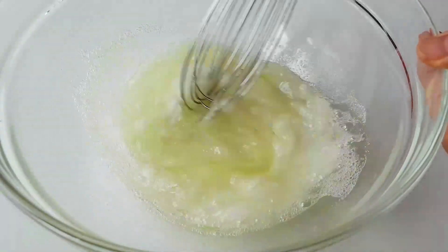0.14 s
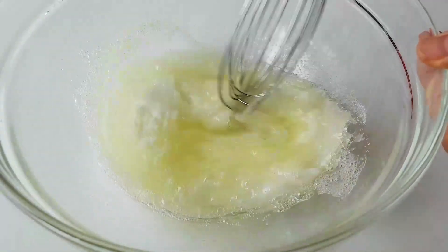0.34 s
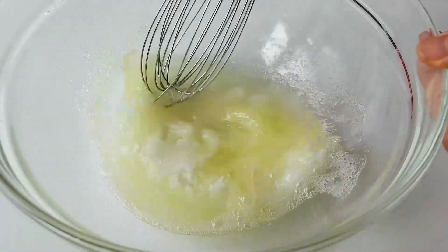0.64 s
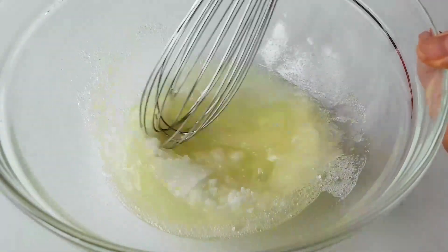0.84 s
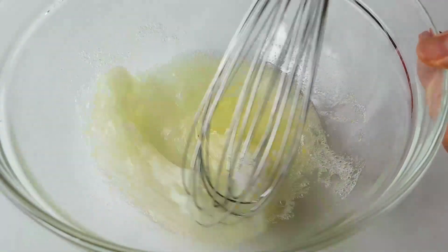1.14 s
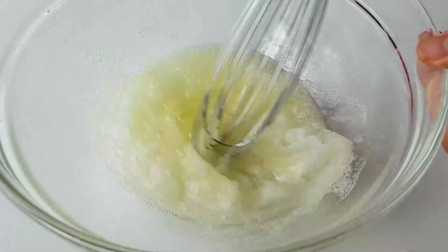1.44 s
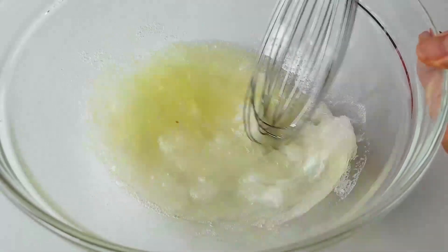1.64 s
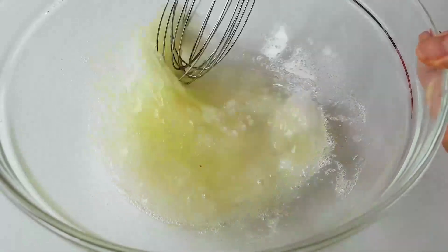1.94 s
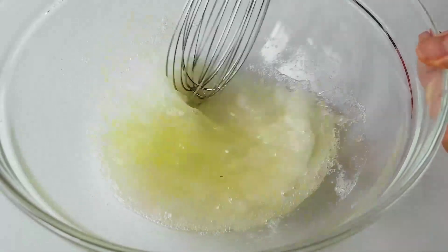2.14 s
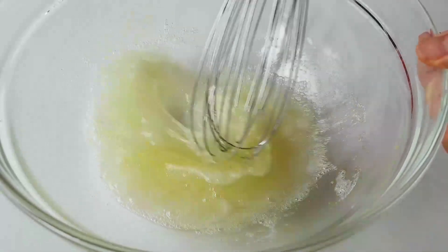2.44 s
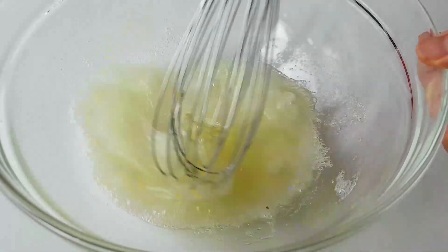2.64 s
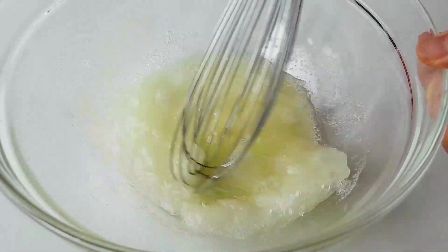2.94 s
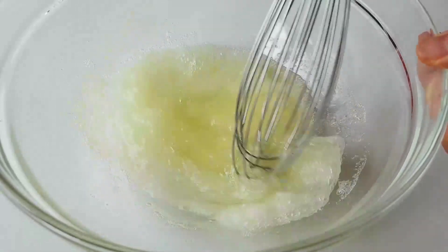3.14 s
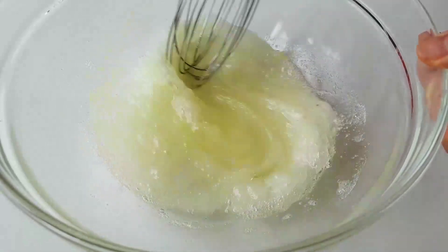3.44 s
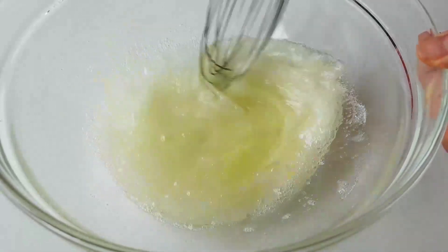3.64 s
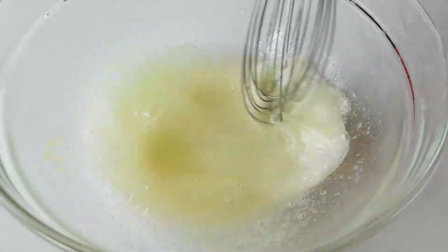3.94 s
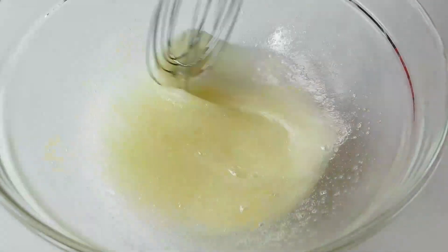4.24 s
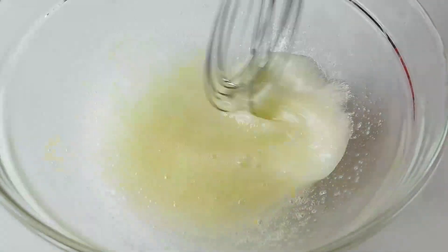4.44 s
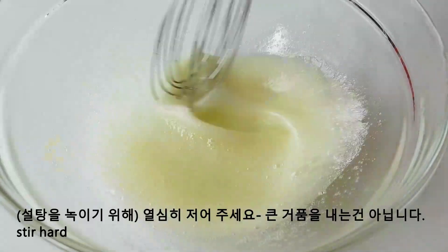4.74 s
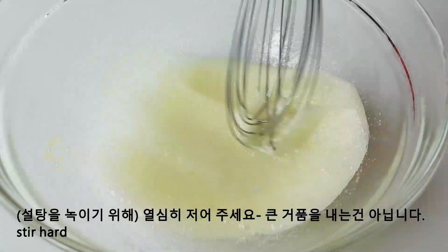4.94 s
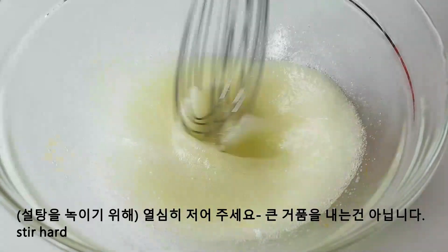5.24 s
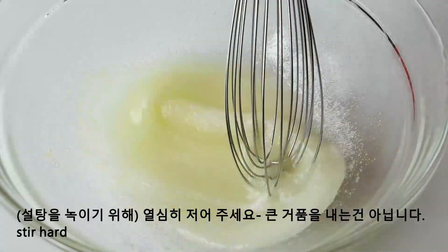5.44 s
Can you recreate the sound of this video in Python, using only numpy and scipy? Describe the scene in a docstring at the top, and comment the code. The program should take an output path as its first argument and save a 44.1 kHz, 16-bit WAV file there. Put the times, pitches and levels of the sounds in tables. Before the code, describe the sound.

A wire whisk beats egg and sugar in a glass bowl, close to the microphone in a quiet kitchen. Quick, uneven, gritty scrapes run throughout, mixed with soft sloshing and small wet slaps. The bowl knocks on a hollow counter now and then, and the wires clink brightly on the glass about two seconds in. The loudest knock and slap come near the end.

```python
"""Whisking egg and sugar

A wire whisk works in a glass bowl on a hollow kitchen counter, close to a stereo microphone.
Friction on sugar grains excites whisk and bowl in short strokes; the batter swishes, slaps and pops.
The bowl knocks the counter into booming resonance, and the wires clink on bare glass.
A look-ahead gain control ducks just before loud blows."""
import sys
import numpy as np
from scipy import signal
from scipy.fft import rfft, irfft, next_fast_len
from scipy.io import wavfile
from scipy.ndimage import uniform_filter1d

SR = 44100
rng = np.random.default_rng(int(sys.argv[2]) if len(sys.argv) > 2 else 0)


def output_pcm(signal):
    """Save a mono or channel-first signal as 16-bit PCM at the path in sys.argv[1].

    Samples are clipped to [-1, 1] before scaling.
    """
    pcm = np.clip(np.atleast_2d(signal).T, -1, 1) * 32767
    wavfile.write(sys.argv[1], SR, np.round(pcm).astype(np.int16))


N = 246078

# Strokes of the wires on the glass. Each row: start in seconds, length in seconds, level in dB,
# treble offset in dB.
STROKES = [(0.036, 0.029, -43.5, -0.5), (0.09, 0.09, -47, -8.5), (0.27, 0.017, -49.5, 2),
           (0.362, 0.078, -47.5, -1.5), (0.483, .033, -47.5, 7), (0.608, 0.059, -46, 0),
           (0.714, 0.038, -42.5, 1.5), (0.798, .015, -45, 0), (0.824, .045, -52, 2.5),
           (0.958, 0.139, -48.5, -5), (1.16, 0.018, -50, 5.5), (1.246, 0.047, -54, 1),
           (1.369, .029, -51.5, -11), (1.396, 0.025, -56, 8.5), (1.452, 0.061, -48, 4),
           (1.542, 0.049, -51.5, -4), (1.594, 0.026, -51, 3), (1.694, 0.03, -38.5, -5.5),
           (1.741, .1, -47, -1), (1.93, 0.052, -45, -11), (1.997, 0.041, -43, 7.5), (2.058, 0.017, -50, -2),
           (2.123, 0.05, -41.5, -2), (2.228, 0.057, -39.5, -3.5), (2.306, 0.069, -52, -17),
           (2.369, 0.021, -45, 1), (2.453, 0.032, -39, -2), (2.541, 0.062, -39.5, -9),
           (2.673, 0.021, -35.5, -9.5), (2.764, 0.071, -47.5, 4.5), (2.889, 0.021, -45.5, 6),
           (2.957, 0.062, -43, 2.5), (3.101, 0.029, -45, 4.5), (3.205, 0.05, -42.5, 1),
           (3.265, 0.022, -52, 0), (3.412, 0.04, -40.5, -10), (3.453, 0.049, -47, -10),
           (3.653, .12, -53, -3), (3.791, 0.0072, -38.5, -2), (3.798, 0.08, -53, 2.5),
           (3.972, 0.062, -51.5, 4), (4.065, 0.07, -54.5, -10), (4.098, 0.053, -49, 7),
           (4.257, 0.039, -48, 4.5), (4.344, .017, -49, 7), (4.525, 0.033, -56.5, 6.5),
           (4.583, 0.0072, -49, -11), (4.599, 0.018, -46.5, 8), (4.739, 0.007, -42, 2.5),
           (4.781, 0.0079, -34.5, -27), (4.839, 0.053, -41, -0.5), (5, 0.0068, -41, 2),
           (5.065, 0.037, -50.5, -19), (5.07, .015, -55, 4), (5.107, 0.032, -40, 0),
           (5.162, 0.019, -44.5, 2.5), (5.232, 0.037, -46.5, 5.5), (5.321, .026, -43, -5),
           (5.37, 0.02, -45.5, 5), (5.448, 0.0047, -36.5, 4), (5.543, 0.015, -49.5, 5.5)]
# Modes of whisk and bowl under friction. Each row: frequency in Hz, bandwidth in Hz, level in dB.
RUBBED_MODES = [(2330, 70, 0), (2540, 100, -2), (3250, 130, -4), (3650, 300, -6), (4250, 200, -5),
                (5900, 400, -9), (7290, 110, -2), (7750, 400, -4), (8020, 130, -3), (9800, 250, -5),
                (10900, 400, -8), (11700, 300, -8), (12720, 260, -4), (14500, 300, -8), (15200, 300, -9)]
# Spectrum of the sugar grains. Each row: frequency in Hz, relative density in dB.
GRIT_SPECTRUM = [(900, -31), (1500, -54), (2500, 10.5), (5500, 7), (7800, 16), (10800, 6.5), (13000, 15.5),
                 (16000, 5.5)]
# Slaps of the batter. Each row: start in seconds, air pocket pitch in Hz, its level in dB,
# splash pitch in Hz, its level in dB, crack level in dB, splash left over right in dB.
SLAPS = [(0.127, 536, -54, 2320, -46, -28.5, -10), (.806, 780, -43, 1870, -28, -23.5, 17),
         (.887, 855, -46, 1200, -37, -57, 11), (0.944, 670, -30, 1800, -30.5, -56, 14.5),
         (0.987, 726, -53, 1480, -31, -40, -2), (1.176, 940, -51, 2470, -35, -27.5, -3),
         (1.56, 517, -37.5, 980, -40, -33, -8), (1.709, 905, -37, 1340, -14, -39, -5.5),
         (1.957, 770, -25.5, 930, -38, -28.5, -12), (2.148, 566, -29, 1290, -25.5, -30, 0),
         (2.234, 750, -37, 1700, -43, -49, 0), (2.387, 530, -50, 2380, -35, -34, 15),
         (2.458, 785, -40.5, 1190, -46, -50, -2), (2.687, 810, -30.5, 1350, -19.5, -23, -3),
         (2.775, 950, -37, 1300, -46, -50, 0), (2.962, 734, -34, 1160, -23.5, -28.5, -4),
         (3.233, 493, -46, 2430, -42, -26.5, 12), (3.358, 980, -58, 1420, -40, -60, 8),
         (3.426, 760, -35.5, 2000, -19, -27, -8), (3.794, 438, -42.5, 2420, -42.5, -34, -24),
         (4.26, 600, -49, 2360, -40.5, -42, -35), (4.297, 615, -38, 1320, -41, -50, 7),
         (4.531, 606, -25, 1250, -20, -32, 4), (4.624, 600, -37, 1240, -29.5, -45, 1),
         (4.79, 552, -19, 1320, -14, -35, -2.5), (4.903, 646, -27, 1270, -25, -53, -11.5),
         (5.06, 488, -27, 1870, -24.5, -31, -11), (5.328, 635, -27.5, 1480, -25.5, -34, 9),
         (5.452, 557, -10, 1205, -12, -26, -22.5)]
# Batter moving between strokes. Each row: time in seconds, level in dB.
SLOSH_LEVELS = [(0.0, -57.5), (0.12, -55.5), (0.9, -50.5), (1.23, -52), (2.07, -51.5), (2.95, -48.5),
                (3.43, -54.5), (4.6, -58), (4.69, -54), (5.58, -56)]
# Spectrum of the slosh. Each row: frequency in Hz, relative density in dB.
SLOSH_SPECTRUM = [(200, 7), (350, -4), (800, 1.5), (1500, 3), (3000, 0), (6000, -2), (10000, -6.5),
                  (16000, -8.5)]
# What a middling stroke stirs up. Each row: time in seconds, wet swish in dB, counter rumble in dB.
STIRRED_LEVELS = [(0, -50.5, -49), (.4, -50, -50), (.75, -49, -48), (1.2, -63, -52), (1.6, -46.5, -45),
                  (2.0, -48.5, -48), (2.3, -54.5, -45), (2.95, -52, -43), (3.3, -56, -50),
                  (3.7, -50.5, -51.5), (4.1, -54.5, -50), (4.5, -39.5, -45.5), (4.9, -69, -50.5),
                  (5.3, -45.5, -43), (5.58, -56, -44)]
# Knocks of bowl on counter. Each row: start in seconds, level in dB, spot on the bowl's foot from 0 to 1,
# hardness in dB per octave.
KNOCKS = [(0.36, -30.5, 0.44, -1.5), (0.484, -31.5, 0.28, -6), (0.802, -39, 0.98, -3.5),
          (0.956, -37, 0.07, -6), (1.709, -33, 0.54, -13.5), (2.006, -30.5, 1, 0), (2.133, -31.5, 0.1, 4),
          (2.235, -30.5, 0, -1), (2.324, -40, 0, 10), (2.456, -34.5, 0.05, 3), (2.542, -27, 0.36, -0.5),
          (2.766, -31, 0.6, -4), (2.958, -18, 0.13, -5), (3.22, -39.5, 1, -8), (3.423, -27.5, 0.43, -5.5),
          (3.784, -33.5, 0.31, -0.5), (4.098, -35.5, 0.07, 3), (4.529, -38.5, 0.76, 3.5),
          (4.789, -34, 0.61, 10), (5.058, -44, 0.9, 6), (5.238, -28, 0.63, -7), (5.452, -13.5, 0.63, 3)]
# Modes of the struck counter. Each row: frequency in Hz, 60 dB decay time in seconds, neighbour mode
# in Hz, its relative level in dB, level of the pair in dB, best driving spot from 0 to 1.
COUNTER_MODES = [(53.3, 0.72, 27, -6, -12, 0), (141.2, 0.58, 150, -16.5, -0.5, 1),
                 (203.6, 0.35, 100, -18, -5.5, 0.47), (269.1, 0.43, 282, -3.5, 0.5, 0.07),
                 (425, 0.37, 445, -8, -2, 0.92)]
# Modes of the counter under stirring. Each row: frequency in Hz, bandwidth in Hz, level in dB.
RUMBLE_MODES = [(48.8, 10.5, 5.5), (144.4, 10.4, 1.5), (189, 2.5, -3), (208, 16.4, -5), (234.7, 10, 0.5),
                (270.5, 15, 2), (412, 140, -5), (598, 7, -6.5)]
# Strikes on bare glass. Each row: start in seconds, level in dB.
CLINKS = [(2.001, -26), (2.005, -49), (2.027, -38.5)]
# Modes of the struck bowl. Each row: frequency in Hz, level in dB, 60 dB decay time in seconds.
GLASS_MODES = [(1845, -9, .09), (2000, -12, .16), (3040, -14, .12), (3120, -13, .08), (3940, -14, .08),
               (4230, -11, .16), (4305, -9, .18), (4985, -14, .1), (5638, 0, .17), (7575, -11, .09),
               (7980, -7, .08), (8710, -7, .1), (9725, -5, .09), (11110, -13, .07), (12450, -3, .06),
               (14520, -8, .1), (15075, -11, .07)]
# Spectrum of the room tone. Each row: frequency in Hz, relative density in dB.
ROOM_SPECTRUM = [(15, -24), (25, 14), (263, 7), (463, -1.5), (2050, -6), (2410, -4.5), (5730, -42),
                 (7920, -10), (9070, -74), (16000, -44.5)]

TREBLE_FROM_HZ = 6000
LEFT_LAG_S = -0.00023   # negative: sound reaches the left port first
RUN_UP_S, CRACK_S = 0.001705, 0.0019   # a slap's swell to its peak; the crack's added damping
WASH_DB, WASH_S = -18.5, 0.025   # thrown batter: level against the pocket note, time constant
MIDDLING_DB = -46
SWISH_FOLLOWS, RUMBLE_FOLLOWS = 0.97, 0.29   # share taken up of a stroke's dB above middling
ROCKING_S = 0.021   # the bowl rocks this long while it feeds the counter
OFF_SPOT_DB, PIVOT_HZ = 23, 186   # loss per unit of distance from the best spot; pivot of the hardness tilt
ROOM_T60_S, WALL_CUT_HZ = 0.61, 2300
MIC_LOW_CUT_HZ, MIC_HIGH_CUT_HZ = 52, 16000


def scrape():
    """Friction: sugar grains under the wires click densely into the modes of whisk and bowl."""
    start_s, _, level_db, treble_db = np.transpose(STROKES)
    clicks = grains(7000, 2.8, channels=3)
    body = resonate(clicks, RUBBED_MODES, shifting_db=4.5) * amp(-6)
    friction = stereo(body + coloured(clicks, GRIT_SPECTRUM), 0.12, LEFT_LAG_S) * flutter(80, 2.5)
    low = rms_one(butter(friction, 4, TREBLE_FROM_HZ, "low"))
    high = rms_one(butter(friction, 4, TREBLE_FROM_HZ, "high"))
    low *= amp(-1) * pressure(level_db, rise_s=0.0006, fall_s=0.019)
    high *= pressure(level_db + treble_db, rise_s=0.0054, fall_s=0.01)
    landing = 1 + decays(start_s, -14, fall_s=0.0011)   # extra force at first contact
    return landing * (low + high)


def slaps():
    """Cavity resonance: a trapped air pocket rings low, under a rising splash note, droplets and a crack."""
    out = np.zeros((2, N + SR))
    t = np.arange(round(.08 * SR)) / SR - RUN_UP_S
    noise = rng.standard_normal((len(SLAPS), 2, len(t)))
    port_t = t - np.array([[0], [-LEFT_LAG_S]])   # time since the peak at each port
    swell = np.exp(np.minimum(port_t, 0) / 0.00022)
    after = np.maximum(port_t, 0)
    for (s, pocket_hz, pocket_db, splash_hz, splash_db, crack_db, pan_db), puff in zip(SLAPS, noise):
        pocket = np.sin(2 * np.pi * pocket_hz * t) * amp(pocket_db - 60 * after / 0.03)
        splash = np.sin(2 * np.pi * splash_hz * port_t * (1 + 5.7 * port_t))
        splash *= amp(splash_db - 60 * after / 0.014)
        notes = swell * (pocket * pan(5.2) + splash * pan(pan_db))
        burst = (puff[0] + puff) * swell * np.exp(-after / 0.002)
        crack = butter(burst * np.exp(-after / CRACK_S), 1, 6000, "high") * amp(crack_db)
        droplets = butter(burst, 1, [0.96 * splash_hz, 1.92 * splash_hz], "band") * amp(splash_db)
        at = round(s * SR)
        out[:, at:at + len(t)] += notes + crack + droplets
    return out[:, :N]


def batter():
    """Bubble noise: tiny bursts merge into a steady slosh; a wet swish follows each stroke and slap."""
    fizz = grains(2500, 1.1, channels=3)
    lone_pops = .4 * grains(40, 2.3, channels=3)
    slosh = stereo(coloured(fizz + lone_pops, SLOSH_SPECTRUM), 0.26, LEFT_LAG_S)
    slosh *= amp(np.interp(np.arange(N) / SR, *np.transpose(SLOSH_LEVELS))) * flutter(25, 3)
    swish = butter(grains(1500, 0.52, channels=3), 2, [480, 2100], "band")
    swish = rms_one(stereo(swish, 0.25, LEFT_LAG_S))
    pushed = pressure(stirred(column=1, follows=SWISH_FOLLOWS), rise_s=0.0009, fall_s=0.004)
    slap_s, _, pocket_db, *_ = np.transpose(SLAPS)
    thrown = decays(slap_s, pocket_db + WASH_DB, WASH_S)
    return slosh + swish * (pushed + thrown) * flutter(40, 3)


def counter():
    """Forced vibration: knocks drive modes that beat with their neighbours; strokes sustain a rumble."""
    start_s, db, spot, hardness = np.transpose(KNOCKS)
    at = np.round(start_s * SR).astype(int)
    soft = np.hanning(round(ROCKING_S * SR))
    boom = 0
    for hz, t60, near_hz, near_db, mode_db, best_spot in COUNTER_MODES:
        blows = np.zeros(N)
        spot_loss_db = OFF_SPOT_DB * abs(spot - best_spot)
        blows[at] = amp(db + mode_db - spot_loss_db + hardness * np.log2(hz / PIVOT_HZ))
        rocking = soft / soft.sum() * np.cos(2 * np.pi * hz * np.arange(len(soft)) / SR)
        push = signal.fftconvolve(blows, rocking)[:N]
        boom += ring(push, hz, t60) + amp(near_db) * ring(push, near_hz, 0.85 * t60)
    rumble = rms_one(resonate(rng.standard_normal((3, N)), RUMBLE_MODES, shifting_db=3.5))
    drive = pressure(stirred(column=2, follows=RUMBLE_FOLLOWS), rise_s=0.0023, fall_s=0.036)
    return (boom + stereo(rumble, 0.98) * drive) * pan(1.6)


def clink():
    """Free vibration: each strike rings every glass mode, with a different strength at each port."""
    at = [round(s * SR) for s, _ in CLINKS]
    strike_db = np.array(CLINKS)[:, 1]
    out = np.zeros((2, N))
    for hz, mode_db, t60 in GLASS_MODES:
        clicks = np.zeros((2, N))
        clicks[:, at] = amp(strike_db + mode_db + rng.normal(0, 1.5, (2, len(at))))
        out += ring(clicks, hz, t60) * flutter(70, 3)   # the wires rattle
    return out


def kitchen(x):
    """Reverberation: six echo paths a side lose level and treble to the walls on every round."""
    out = np.zeros((2, N))
    dull = np.exp(-2 * np.pi * WALL_CUT_HZ / SR)
    for k, lag in enumerate((rng.uniform(.008, 0.016, 12) * SR).astype(int)):
        loop, state = x.copy(), [0.]
        gain = amp(-60 * lag / SR / ROOM_T60_S)
        for i in range(lag, N, lag):
            back, state = signal.lfilter([gain * (1 - dull)], [1, -dull], loop[i - lag:i], zi=state)
            loop[i:i + lag] += back[:N - i]
        out[k % 2] += (loop - x) * (-1) ** (k // 2)
    return out


def room_tone():
    """Ambient noise: steady, low and almost fully coherent between the ports."""
    return amp(-55.5) * coloured(stereo(rng.standard_normal((3, N)), 0.97), ROOM_SPECTRUM)


def pressure(levels_db, rise_s, fall_s):
    """Contact envelope: each stroke rises quickly, holds, then decays exponentially."""
    held = np.zeros(N)
    for (s, length, *_), db in zip(STROKES, levels_db):
        held[round(s * SR):round((s + length) * SR)] = amp(db)
    fall = np.arange(N) / (fall_s * SR)
    with_tails = np.exp(np.maximum.accumulate(np.log(held + 1e-9) + fall) - fall)
    pole = np.exp(-1 / (rise_s * SR))
    return signal.lfilter([1 - pole], [1, -pole], with_tails)


def stirred(column, follows):
    """Coupling: each stroke stirs up the level of that moment plus a share of its own strength, in dB."""
    start_s, _, level_db, _ = np.transpose(STROKES)
    middling_response_db = np.interp(start_s, *np.transpose(STIRRED_LEVELS)[[0, column]])
    return middling_response_db + follows * (level_db - MIDDLING_DB)


def decays(start_s, db, fall_s):
    """Relaxation: an envelope jumps at each start and decays exponentially."""
    jumps = np.zeros(N)
    jumps[np.round(start_s * SR).astype(int)] = amp(db)
    return signal.lfilter([1], [1, -np.exp(-1 / (fall_s * SR))], jumps)


def grains(per_s, spread_db, channels):
    """Shot noise: random clicks of uneven size, at rms 1."""
    shape = (channels, N)
    sizes = amp(spread_db * np.minimum(rng.exponential(1, shape), 5)) * rng.choice([-1, 1], shape)
    return rms_one(sizes * (rng.random(shape) < per_s / SR))


def resonate(x, modes, shifting_db):
    """Modal superposition: each resonance waxes and wanes as the contact point moves."""
    out = 0
    for k, (hz, width, db) in enumerate(modes):
        t60 = np.log(1000) / (np.pi * width)
        out += (-1) ** k * amp(db) * rms_one(ring(x * flutter(16.2, shifting_db), hz, t60))
    return out


def ring(clicks, hz, t60):
    """Damped oscillator: a unit click starts a decaying sine of height 1."""
    r, w = amp(-60 / (t60 * SR)), 2 * np.pi * hz / SR
    return signal.lfilter([0, np.sin(w)], [1, -2 * r * np.cos(w), r * r], clicks + 1e-18)


def flutter(hz, depth_db):
    """Amplitude modulation: a gain that wavers randomly at rates up to about hz."""
    return amp(depth_db * rms_one(butter(rng.standard_normal(N), 2, hz, "low")))


def stereo(parts, alike, lag_s=0):
    """Partial coherence: both ports hear the first part, the left shifted by lag_s, and one part each."""
    shared, own = parts[0], parts[1:]
    left = np.interp(np.arange(N) - lag_s * SR, np.arange(N), shared)
    return np.sqrt(alike) * np.array([left, shared]) + np.sqrt(1 - alike) * own


def coloured(x, spectrum):
    """Spectral shaping by (Hz, dB) points, at rms 1."""
    hz, db = np.transpose(spectrum)
    size = next_fast_len(N)
    bins = np.maximum(np.fft.rfftfreq(size, 1 / SR), 1)
    gain = amp(np.interp(np.log(bins), np.log(hz), db))
    return rms_one(irfft(rfft(x, size) * gain, size)[..., :N])


def butter(x, order, hz, kind):
    """Maximally flat filter."""
    return signal.sosfilt(signal.butter(order, hz, kind, fs=SR, output="sos"), x)


def pan(db):
    """Gains that put left db above right."""
    return amp([[db / 2], [-db / 2]])


def amp(db):
    """dB to gain."""
    return 10 ** (np.asarray(db) / 20)


def rms_one(x):
    """Scale to rms 1."""
    return x / np.sqrt(np.mean(x ** 2) + 1e-20)


def scene():
    """Superposition: bowl and counter, the echo of slaps and clinks, and the room tone."""
    blows = slaps() + clink()
    stirring = scrape() + batter()
    air = room_tone()
    echo = kitchen(amp(-19) * blows.mean(axis=0))
    return blows + stirring + counter() + echo + air


def record(dry):
    """Look-ahead gain control: the level ducks just before a sudden jump; bottom and top are cut."""
    power = uniform_filter1d((dry ** 2).mean(axis=0), round(.008 * SR))
    ahead = round(.012 * SR)
    coming = np.r_[power[ahead:], np.full(ahead, power[-1])]
    jump_db = 10 * np.log10((coming + 1e-9) / (power + 1e-9))
    duck_db = .7 * uniform_filter1d(np.clip(jump_db - 6, 0, 40), round(.005 * SR))
    ducked = butter(dry * amp(-duck_db), 4, MIC_LOW_CUT_HZ, "high")
    return signal.sosfilt(signal.ellip(10, .5, 60, MIC_HIGH_CUT_HZ, fs=SR, output="sos"), ducked)


dry = scene()
out = record(dry)
output_pcm(out)
```